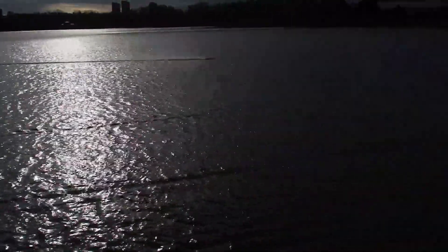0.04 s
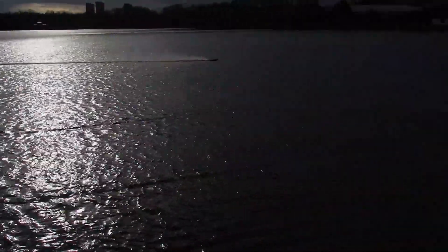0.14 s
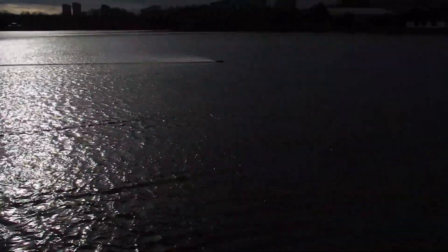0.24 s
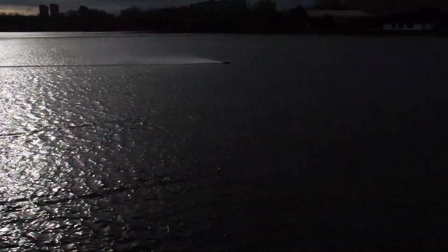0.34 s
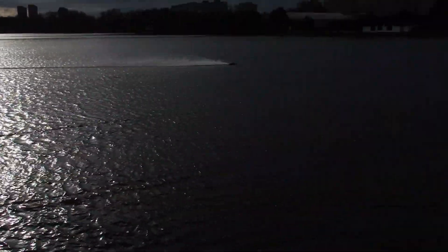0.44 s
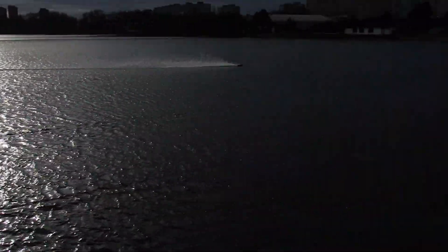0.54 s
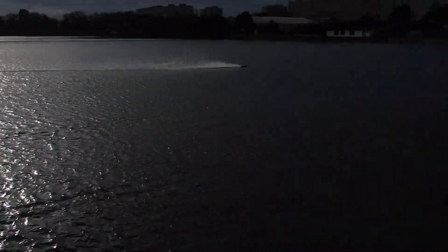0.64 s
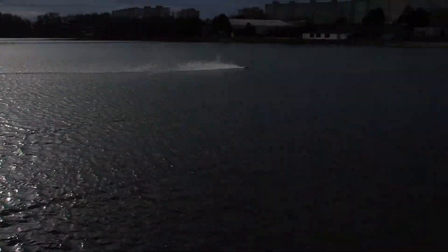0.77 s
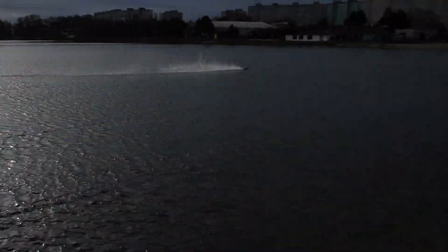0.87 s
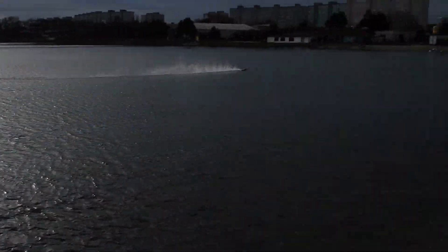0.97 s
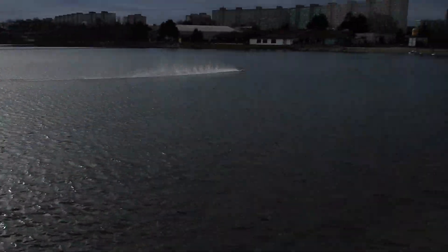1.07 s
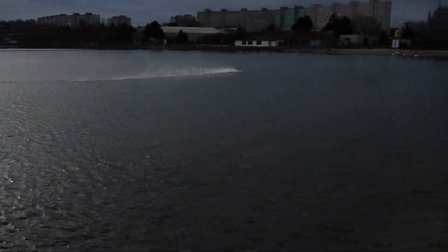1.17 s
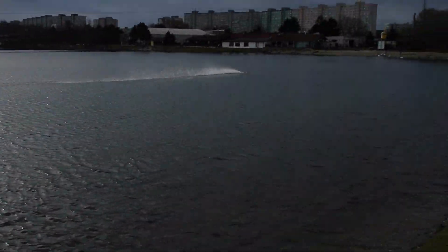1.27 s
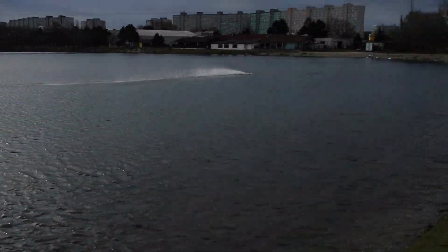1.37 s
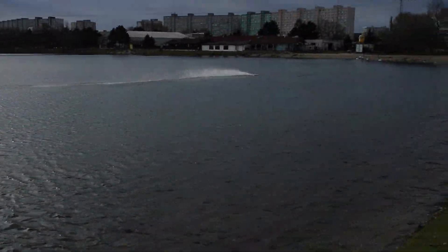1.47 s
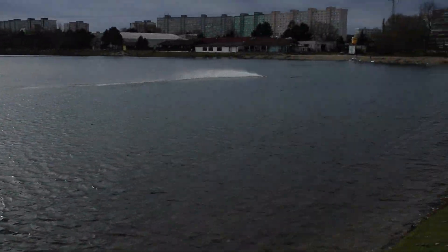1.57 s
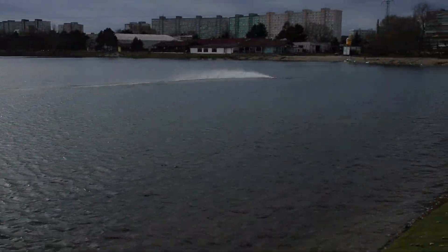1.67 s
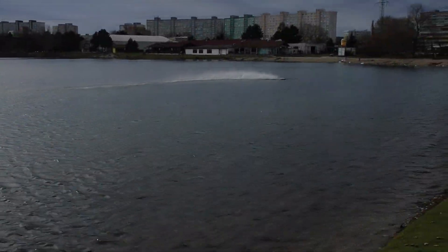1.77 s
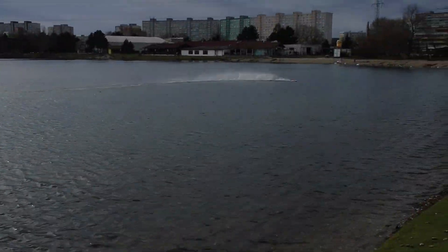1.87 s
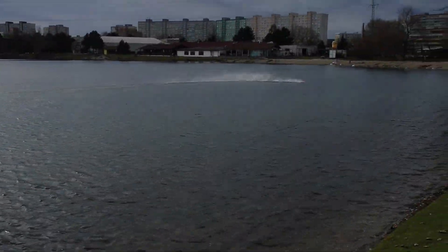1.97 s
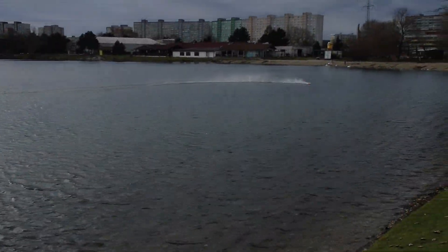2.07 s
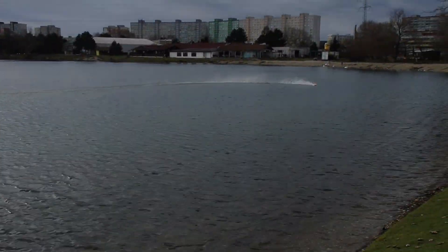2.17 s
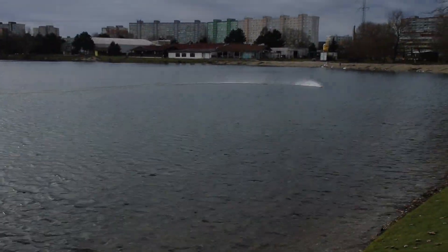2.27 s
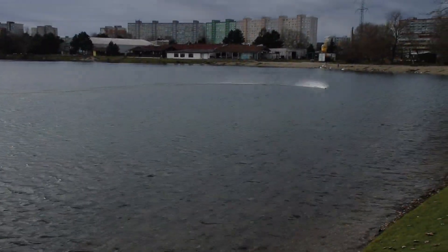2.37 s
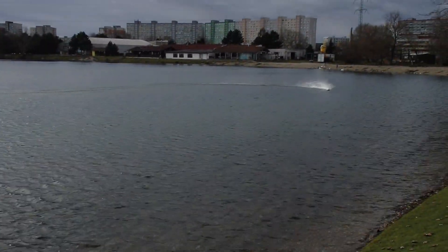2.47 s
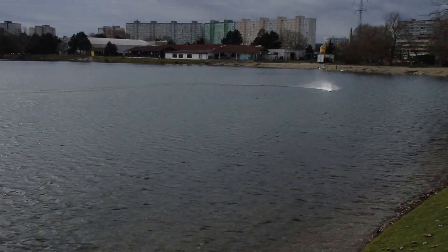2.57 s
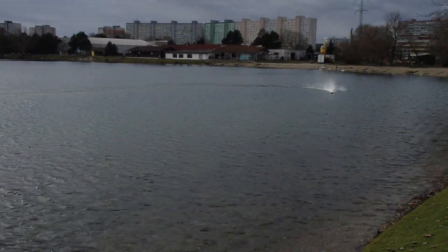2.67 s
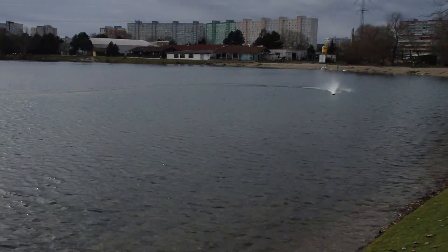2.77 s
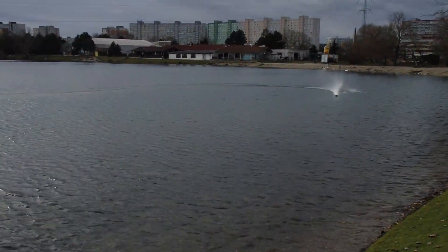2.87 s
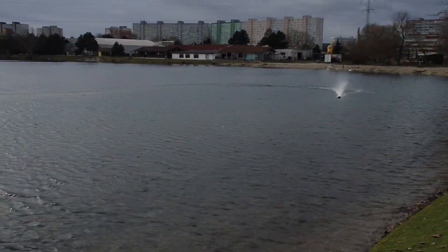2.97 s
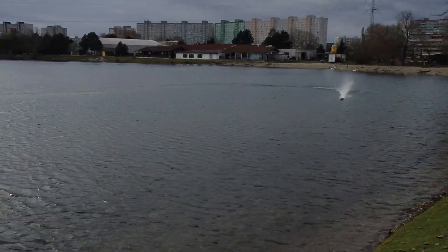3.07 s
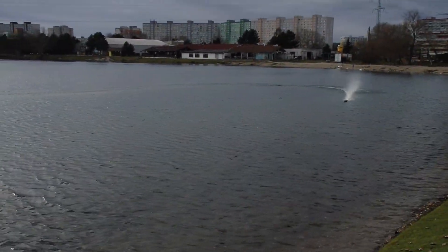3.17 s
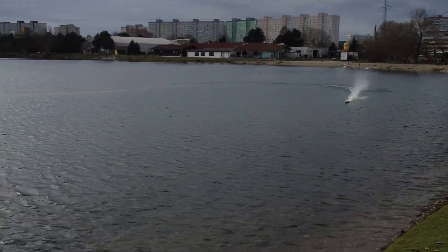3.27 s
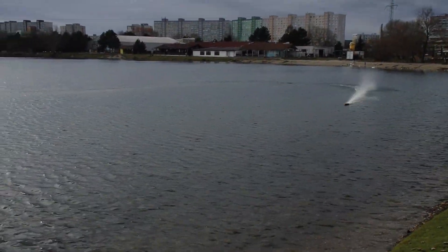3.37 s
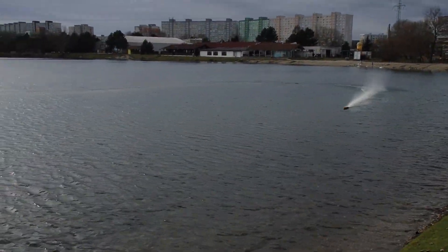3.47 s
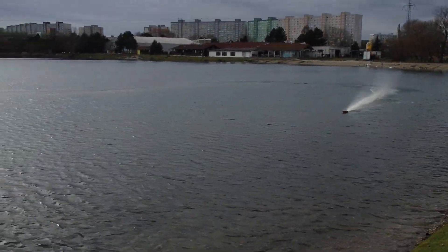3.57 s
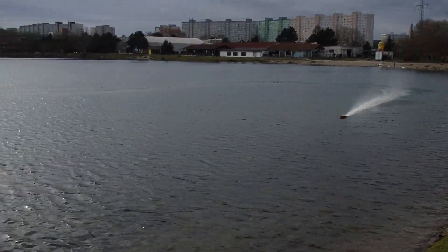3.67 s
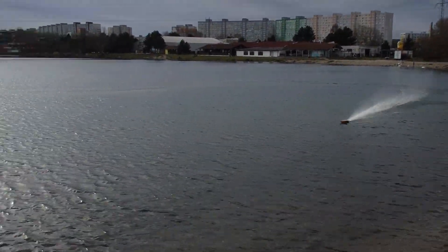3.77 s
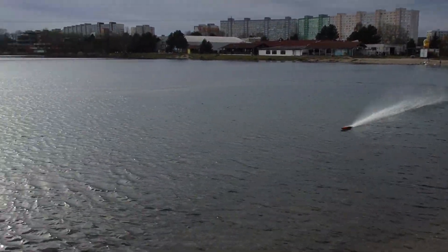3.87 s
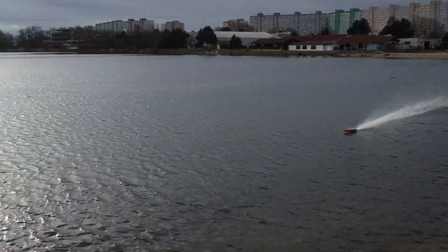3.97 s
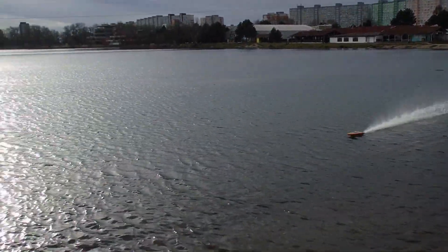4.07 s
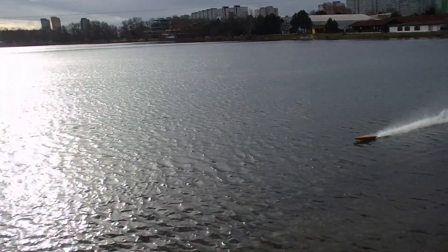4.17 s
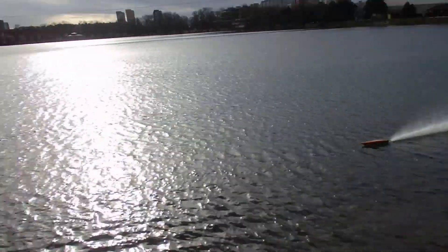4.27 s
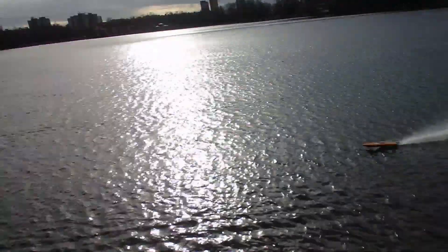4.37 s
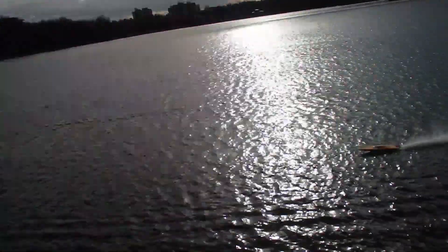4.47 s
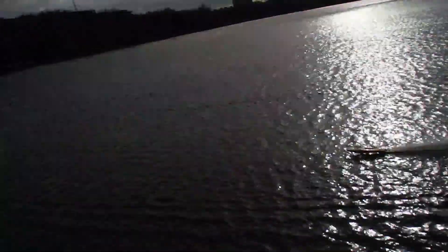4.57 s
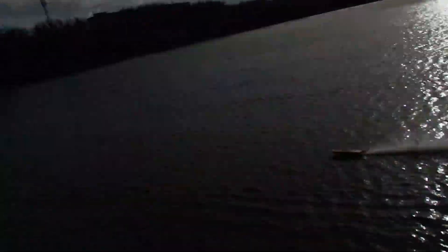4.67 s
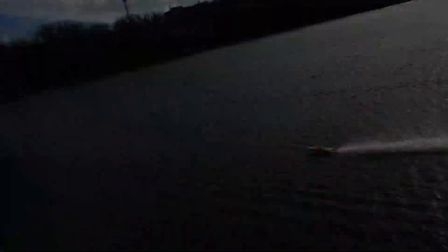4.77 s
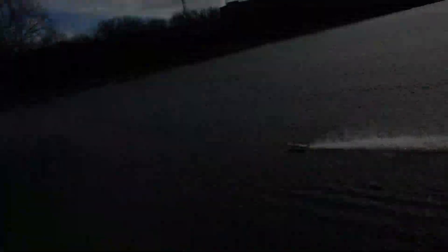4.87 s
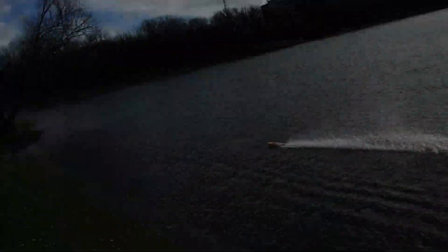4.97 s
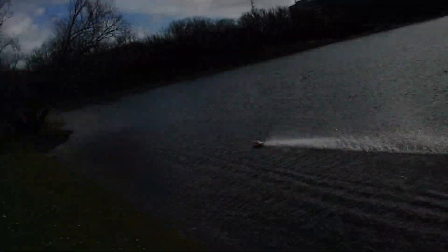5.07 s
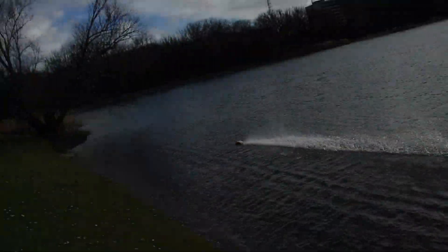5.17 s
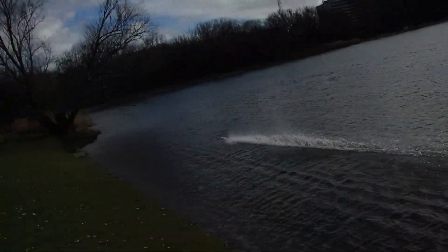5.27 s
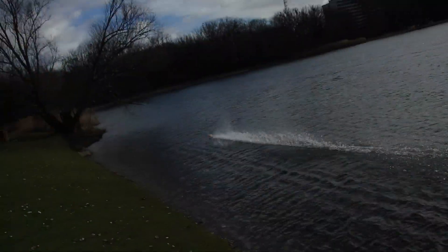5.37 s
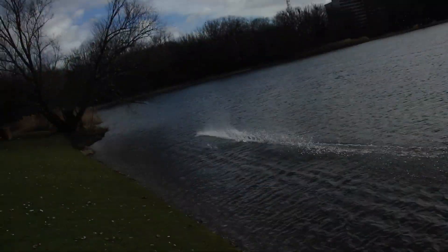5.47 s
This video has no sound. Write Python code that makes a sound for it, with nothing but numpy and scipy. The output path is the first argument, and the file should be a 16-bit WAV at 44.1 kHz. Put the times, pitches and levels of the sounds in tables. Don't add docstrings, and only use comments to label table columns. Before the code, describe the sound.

A fast electric model boat whines faintly across a lake, dips for a turn, then screams past close with hissing spray and fades slightly.

```python
import sys
import numpy as np
from scipy import signal
from scipy.fft import rfft, irfft, next_fast_len
from scipy.io import wavfile
from scipy.ndimage import uniform_filter1d

SR = 44100
rng = np.random.default_rng(int(sys.argv[2]) if len(sys.argv) > 2 else 0)


def store_wav(level_fs):
    pcm = np.round(np.clip(np.atleast_2d(level_fs), -1, 1) * 32767)
    wavfile.write(sys.argv[1], SR, pcm.T.astype(np.int16))


def ratio(d):
    e = np.asarray(d, float) / 20
    return 10 ** e


N = 243431
TIME = np.arange(N) / SR
PADDED = next_fast_len(N, real=True)

# (time [s], shaft rate [Hz])
SHAFT_SPEED = [(0, 496.3), (.3, 490.1), (.62, 475.8), (.8, 463), (1.6, 462), (1.9, 460.8), (2.02, 489),
               (2.06, 371), (2.3, 258), (2.43, 298.3), (2.59, 434), (2.66, 461.7), (3.04, 480.7),
               (3.45, 501.2), (4.2, 510), (4.55, 501.8), (5.0, 466.4), (5.52, 461.6)]
# (time [s], level [dB], brightness [dB per octave], stern facing the shore [0-1], motor tones [dB])
WHINE_COURSE = [(0, -36, 3.5, 0.2, 1.5), (.3, -39.5, -5, 0.6, 14.5), (.55, -31, -1, 0.45, -6),
                (1.0, -33.5, -2, 0.35, -1), (1.3, -37.5, -3, 0.41, 4), (1.6, -36, -18.5, 0.5, 3),
                (2.04, -33, -3.5, 0, -2.5), (2.075, -52, 1, 0.1, -12), (2.29, -58, -6, 0.2, 6),
                (2.35, -47.5, -17, 0, -3.5), (2.5, -44, 4, 0.5, -6), (3.05, -35.5, -7, 0, 8),
                (3.7, -32, -1, 0.03, -1), (4.2, -23.5, -5.5, 0.22, 1.5), (4.62, -11.5, -11, .6, 1),
                (4.8, -25.5, -1, 0.75, 3), (5.2, -21.5, -7.5, 0.94, 2.5), (5.52, -26.5, -5.5, 0.82, -2)]
# (multiple [1], level against the whine [dB], gain when astern [dB])
SHAFT_HARMONICS = [(1, -30.5, 5), (2, 0.5, -2), (3, -6, -6.5), (4, 4.5, -2), (5, -5, -10), (6, -9, 19),
                   (7, -42, 1), (8, -8, 7), (9, -53, -14), (10, -3, 2.5), (11, -14, -16), (12, -4, -8),
                   (14, -15, -14)]
# (time [s], roughness [0-1])
ROUGHNESS = [(0, .6), (.35, .58), (.5, .76), (1.05, .76), (1.15, .58), (1.3, .68), (2.05, .72), (2.3, .48),
             (2.75, .48), (3.0, .42), (4.4, .3), (5.52, .3)]
# (time [s], speed gain [share], length [s])
PROPELLER_SKIPS = [
    (.75, 0.047, 0.032),
    (1.0, 0.018, 0.066),
    (1.36, 0.044, 0.018),
    (2.478, 0.11, 0.034),
    (2.725, .07, 0.0098),
    (3.325, .06, .012),
    (4.44, 0.01516, 0.03082),
    (5.049, 0.046, 0.016),
    (5.389, 0.033, 0.0094),
]
# (time [s], gain [dB], length [s], extra gain of upper tones [dB])
BLADE_BITES = [(0.273, 3.5, 0.048, -7.5), (0.747, 1, 0.028, 2), (0.838, -20, 0.046, 2),
               (0.918, 6.5, 0.0066, -5), (0.985, -0.5, 0.013, 2), (1.11, 4, 0.02, -12),
               (1.207, 0, 0.038, 3.5), (1.43, -7, 0.038, 13), (1.607, 6.5, 0.022, -3),
               (1.908, 6, 0.012, -7), (1.955, -5.5, .012, 5), (1.99, 7, 0.035, -8), (2.017, -21, 0.0047, 3),
               (2.113, 29.5, .012, 3), (2.426, -11, 0.027, 8), (2.59, 10, 0.018, -10.5),
               (2.668, 1, 0.013, -2.5), (2.722, 1, 0.015, 4.5), (3.05, 3.5, .06, -7.5),
               (3.309, -4, 0.02, 9.5), (4.244, -3.5, 0.038, 6.5), (4.506, -3, .02, -1), (4.59, 1, 0.019, 0),
               (4.683, 7, 0.011, -1), (4.745, 1, 0.011, -3), (4.91, 3.5, 0.025, -1.5),
               (5.048, -7, 0.019, 4), (5.11, -3, 0.025, 3.5), (5.31, -12, 0.037, 2.5)]
# (time [s], gain [dB], hold [s])
HULL_SLAMS = [(0, 6.5, 0.0079), (.13, 3.5, 0.021), (0.337, 1.5, 0.057), (0.65, 4.5, 0.016),
              (0.722, 2, 0.022), (0.988, 4.5, 0.016), (1.288, 3, 0.048), (1.43, 4, 0.061), (2.17, 6, .02),
              (2.3, -2, .05), (2.558, 6, 0.016), (2.713, 11.5, 0.0083), (2.84, 7.5, 0.039),
              (2.966, 4, 0.12), (3.27, 3.5, 0.053), (3.361, 7.5, 0.011), (3.452, 4.5, 0.036),
              (3.67, 0.5, 0.018), (3.801, 6, 0.037), (3.996, 5.5, 0.066), (4.186, 9, 0.077),
              (4.386, 6, 0.082), (4.579, 6.5, 0.074), (4.774, 6, 0.091), (5.0, 5.5, 0.0523),
              (5.087, 5, 0.0515), (5.27, 6.5, 0.05), (5.364, 5, 0.035), (5.49, 5, .01)]
# (time [s], hiss [dB], body against hiss [dB])
SPRAY_COURSE = [(0, -36, 9.5), (.76, -32, 6), (.8, -37, 10), (1.0, -34.5, 5.5), (1.5, -39, 9),
                (2.03, -38, 5.5), (2.1, -42.5, 9.5), (2.7, -42, 9), (3.24, -38, 7), (3.5, -32.5, 5.5),
                (4.16, -31, 8.5), (4.3, -21.5, 5), (4.7, -18.5, 5), (5.0, -19, 5), (5.52, -24, 4.5)]
# (frequency [Hz], density [dB per Hz])
SPRAY_SPECTRUM = [(200, -29), (750, -14.5), (950, -3.5), (1400, -8.5), (2200, -2.5), (4000, 0), (5200, 7),
                  (6500, -1.5), (8500, -10), (9500, -6), (11000, -13.5), (12800, -35), (14300, -21.5),
                  (15500, -55)]
# (time [s], peak [dB], pitch [Hz], left minus right [dB])
WIND_BUFFETS = [(0.253, -33, 339, 9), (0.26, -37, 305, 15), (0.352, -33.5, 417, 22), (0.36, -33.5, 306, 24),
                (1.351, -36, 159, -13), (1.385, -26, 250, -9), (1.411, -40, 148, -9.5),
                (1.434, -36, 148, -20), (1.445, -29.5, 430, 5), (1.736, -41, 141, -19),
                (4.635, -24.5, 225.7, -14), (4.659, -22, 363.5, 13), (4.81, -24, 369.7, -6),
                (5.039, -23, 406, -5)]
# (time [s], gain [dB], length [s], left minus right [dB])
WIND_GUSTS = [(.3, 9, 0.14, 2), (0.705, 13.5, 0.24, 1), (1.358, 5, 0.16, -2.5), (1.7, 3.5, 0.34, -9.5),
              (2.12, 1.5, 0.12, 9), (3.209, 3, 0.034, -4), (4.662, 12, 0.047, 11), (4.803, 17, 0.17, -9.5),
              (4.925, 9, .04, 10), (5.055, 12, 0.044, -8), (5.4, 6, 0.11, 9.5)]
# (frequency [Hz], density [dB per Hz])
WIND_SPECTRUM = [(20, -33), (50, -12.5), (100, -4.5), (220, -2.5), (450, -6), (800, -8), (1500, -34)]
# (frequency [Hz], density [dB per Hz])
AIR_SPECTRUM = [(100, -12.5), (500, -2.5), (3000, -20), (5500, 2.5), (9000, -19), (12000, -18)]
# (frequency [Hz], same sound [dB], phase [rad], sound of its own [dB])
RIGHT_PORT_RESPONSE = [(350, 0, -.62, -3), (700, 2, -.96, -12), (2100, .6, -.52, -17),
                       (3100, 1.5, -1.32, -11), (4100, -9.5, -1.91, -17), (4900, -22, -1.95, -30),
                       (5500, -42, -2.6, -42), (6300, -13, -4.7, -18), (6900, -10, -5.46, -17),
                       (7600, -14, -5.9, -18), (8200, -30, -6.16, -26), (10000, -14, -3.84, -17),
                       (12500, -5, -3.4, -2), (14300, -18, -3.2, -10)]

COAST_DB = -20
CRUISE_HZ, SLOW_LOSS_DB = 482, -170
SKIP_LOSS_DB = -60
SLAM_RACE = 0.0015
MOTOR_FADING_DB = 3.5
SLAM_RISE_S, SLAM_FALL_S = 0.0075, 0.054
SLAM_THINS = 0.57
NEAR_DIP_DB = -2
BREEZE_DB, BREEZE_PAN_DB = -52, -2.5
AIR_DB, MIC_HISS_DB = -42.5, -52.5
HISS_SHARED = 0.77


def shaft_speed():
    shaft_hz, = in_time(SHAFT_SPEED)
    planing = np.arange(N) > N // 2
    smooth_hz = uniform_filter1d(shaft_hz, size=SR // 6, mode="nearest")
    shaft_hz = np.where(planing, smooth_hz, shaft_hz)
    climbing = np.interp(TIME, [2.2, 2.3, 3.2, 3.3], [0, 1, 1, 0])
    shortfall = np.maximum(1 - shaft_hz / CRUISE_HZ, 0) * climbing
    racing = bumps(PROPELLER_SKIPS) + SLAM_RACE * uniform_filter1d(slams(), size=SR // 30)
    return shaft_hz * (1 + racing), shortfall


def propeller():
    shaft_hz, shortfall = shaft_speed()
    whine_db, bright_db, astern, motor_db = in_time(WHINE_COURSE)
    whine_db = whine_db + np.interp(TIME, [2.06, 2.075, 2.29, 2.32], [0, COAST_DB, COAST_DB, 0])
    motor_db = motor_db + SKIP_LOSS_DB * bumps(PROPELLER_SKIPS)
    bright_db = bright_db + bumps([(s, upper_db, length) for s, _, length, upper_db in BLADE_BITES])
    slam_db = slams() - uniform_filter1d(slams(), size=SR // 3)
    rough = np.clip(in_time(ROUGHNESS)[0] + 0.05 * slam_db, 0.1, 0.95)
    turns = np.cumsum(shaft_hz * (1 + 0.00626 * rough * drift(34.76))) / SR
    bite_db = bumps([row[:3] for row in BLADE_BITES]) + 1.67 * rough * drift(47)
    whine = np.zeros(N)
    for multiple, db, astern_db in SHAFT_HARMONICS:
        is_motor = multiple > 6.5
        if multiple % 2:
            scattered = 0.6 * rough
        elif is_motor:
            scattered = rough * np.minimum(1.4 * rough, 1)
        else:
            scattered = rough
        smear_hz = 55 + 8 * multiple
        scatter = (drift(smear_hz) + 1j * drift(smear_hz)) / np.sqrt(2)
        swing = np.sqrt(1 - scattered ** 2) + scattered * scatter
        tone = np.exp(2j * np.pi * (multiple * turns + rng.random()))
        level_db = whine_db + db + astern_db * astern
        level_db += bright_db * np.log2(np.clip(multiple / 2, 1, 2))
        level_db += (motor_db + MOTOR_FADING_DB * drift(4.4)) * is_motor
        level_db += SLOW_LOSS_DB * shortfall * (multiple not in (2, 4))
        level_db += bite_db + 3.8 * rough * drift(10.3)
        whine += ratio(level_db) * np.sqrt(2) * np.real(swing * tone)
    return whine, turns


def slams():
    total_db = np.zeros(N)
    for s, db, hold in HULL_SLAMS:
        corners = [s - SLAM_RISE_S, s, s + hold, s + hold + SLAM_FALL_S]
        total_db += np.interp(TIME, corners, [0, db, db, 0])
    return total_db


def spray(turns):
    hiss_db, body_db = in_time(SPRAY_COURSE)
    near = np.clip((hiss_db + 34) / 10, 0, 1)
    hiss_db = hiss_db + slams()
    body_db = body_db - SLAM_THINS * slams()
    droplet_gain = ratio(2.0 * np.minimum(rng.exponential(1, (2, N)), 3.5))
    blade_pulse = 1 + 0.16 * np.cos(4 * np.pi * turns)
    water = rng.standard_normal((2, N)) * droplet_gain * blade_pulse
    water = rfft(rms_one(coloured(water, SPRAY_SPECTRUM)), PADDED)
    together_db = drift(13.6) + 1.26 * drift(105)
    hz = np.fft.rfftfreq(PADDED, 1 / SR)
    edges = [60, 700, 1300, 2300, 3300, 4600, 6400, 9000, 17000]
    out = np.zeros((2, N))
    for low, high in zip(edges, edges[1:]):
        band = irfft(water * ((hz >= low) & (hz < high)), PADDED)[:, :N]
        body = np.clip(np.log2(5000 / np.sqrt(low * high)), 0, 1.5)
        band_db = body * body_db + NEAR_DIP_DB * near * (low == 3300)
        flicker_db = 0.75 * together_db + 1.81 * drift(59)
        out += band * ratio(band_db + flicker_db)
    return ratio(hiss_db + 1.5) * out


def buffets():
    out, t = np.zeros((2, N)), np.arange(SR // 20) / SR
    for s, db, hz, pan_db in WIND_BUFFETS:
        cycles = hz * t
        puff = -np.cos(2 * np.pi * (cycles - 0.6)) * np.exp(-((cycles - 0.8) / 0.69) ** 2)
        at = round(s * SR)
        out[:, at:at + len(t)] += ratio(db + 1.5 + panned(pan_db)) * puff
    return out


def wind():
    level_db = BREEZE_DB + bumps([(s, db, length) for s, db, length, _ in WIND_GUSTS])
    pan_db = BREEZE_PAN_DB + bumps([(s, side_db, length) for s, _, length, side_db in WIND_GUSTS])
    lumps_db = 2.5 * np.array([drift(37), drift(25)])
    gusts = rms_one(coloured(rng.standard_normal((2, N)), WIND_SPECTRUM)) * ratio(lumps_db)
    gusts[1] = coloured(gusts[1], [(70, 4.5), (180, -1)])
    return gusts * ratio(level_db + 1.84 + panned(pan_db))


def air():
    return ratio(AIR_DB) * rms_one(coloured(rng.standard_normal((2, N)), AIR_SPECTRUM))


def microphone_hiss():
    separate = rng.standard_normal((2, N))
    return ratio(MIC_HISS_DB) * (separate + HISS_SHARED * rng.standard_normal(N))


def in_time(rows):
    s, *columns = np.transpose(rows)
    return [np.interp(TIME, s, column) for column in columns]


def over_hz(rows):
    hz, *columns = np.transpose(rows)
    grid = np.log(np.maximum(np.fft.rfftfreq(PADDED, 1 / SR), 1))
    return [np.interp(grid, np.log(hz), column) for column in columns]


def bumps(rows):
    return sum(height * np.exp(-((TIME - s) / length) ** 2) for s, height, length in rows)


def drift(rate_hz):
    pole = np.exp(-2 * np.pi * rate_hz * 8 / SR)
    noise = rng.standard_normal(N // 8 + 4002)
    slow = signal.lfilter([1], [1, -2 * pole, pole * pole], noise)[4000:]
    return np.interp(np.arange(N) / 8, np.arange(len(slow)), rms_one(slow))


def rms_one(x):
    return x / np.sqrt(np.mean(x ** 2) + 1e-20)


def panned(pan_db):
    return pan_db * np.array([[0.5], [-0.5]])


def filtered(x, response):
    return irfft(rfft(x, PADDED) * response, PADDED)[..., :N]


def coloured(x, spectrum):
    return filtered(x, ratio(over_hz(spectrum)[0]))


def scene():
    whine, turns = propeller()
    left, other = spray(turns) + air()
    left = left + whine
    same_db, phase, own_db = over_hz(RIGHT_PORT_RESPONSE)
    right = filtered(left, ratio(same_db) * np.exp(1j * phase)) + filtered(other, ratio(own_db))
    return np.array([left, right]) + wind() + buffets() + microphone_hiss()


def band_limit(x):
    return signal.sosfilt(signal.butter(12, 15750, fs=SR, output="sos"), x)


def record(dry):
    rounded = dry / (1 + np.abs(dry / 0.9) ** 5) ** (1 / 5)
    top_cut = signal.cheby2(12, 60, 16500, fs=SR, output="sos")
    rumble_cut = signal.butter(2, 45, "high", fs=SR, output="sos")
    mix = signal.sosfilt(rumble_cut, signal.sosfilt(top_cut, rounded))
    return band_limit(mix)


dry = scene()
out = record(dry)
store_wav(out)
```